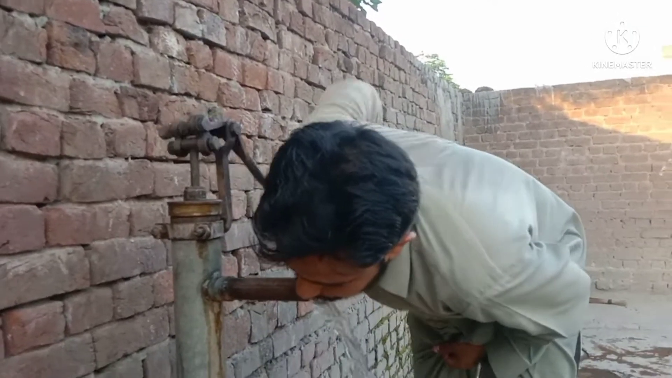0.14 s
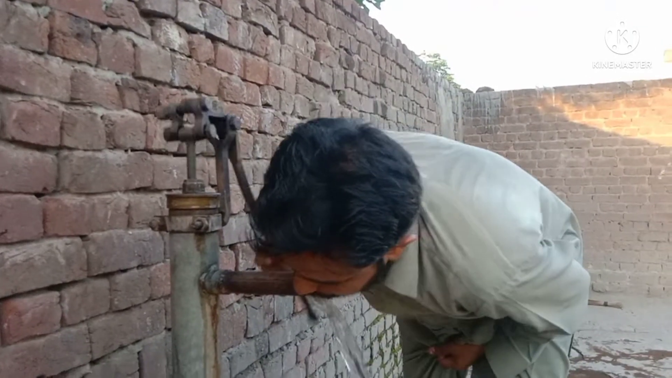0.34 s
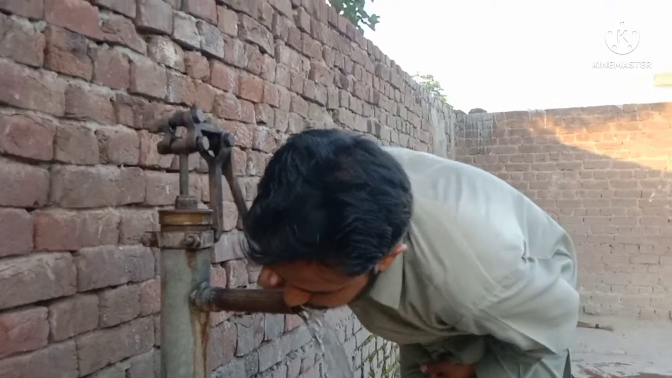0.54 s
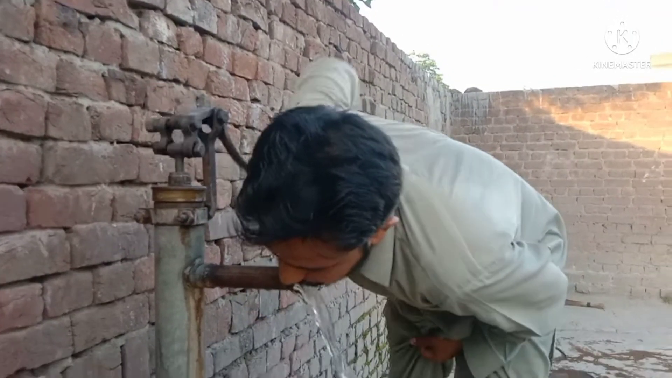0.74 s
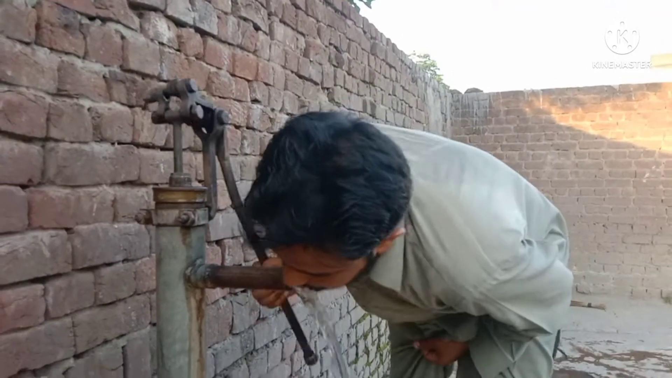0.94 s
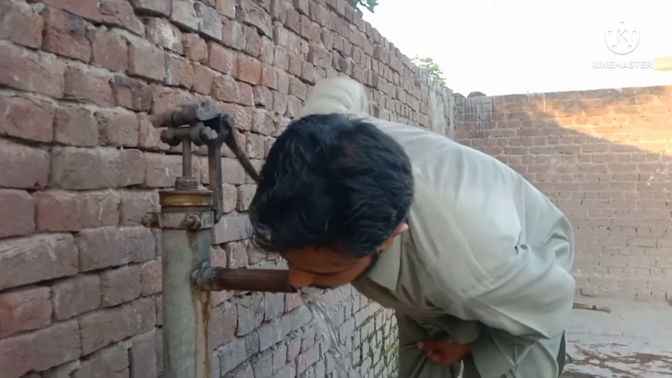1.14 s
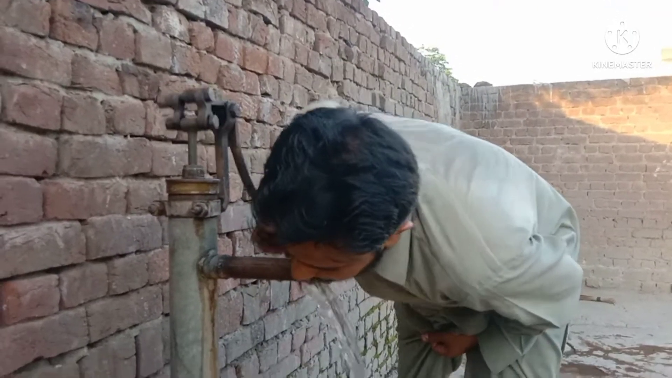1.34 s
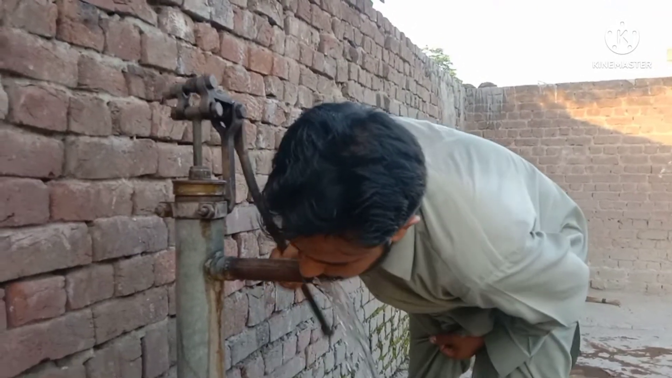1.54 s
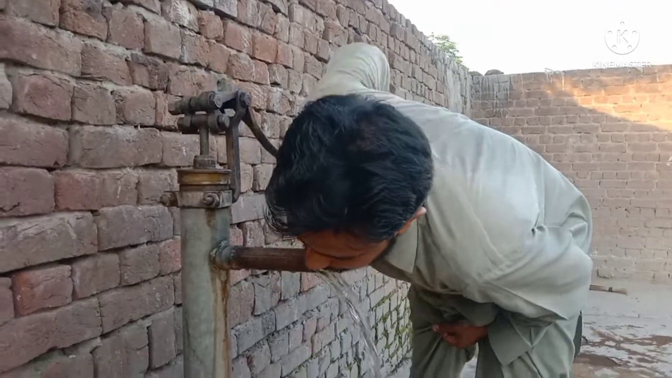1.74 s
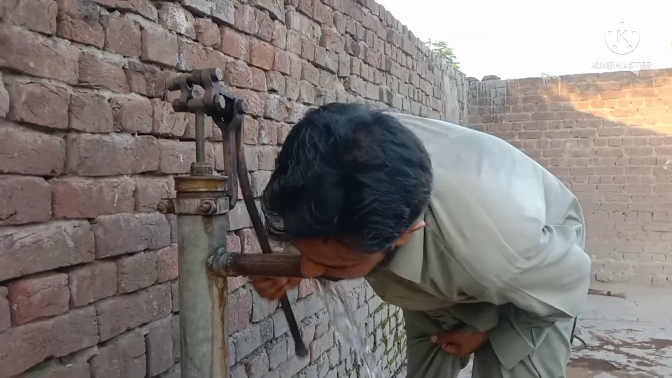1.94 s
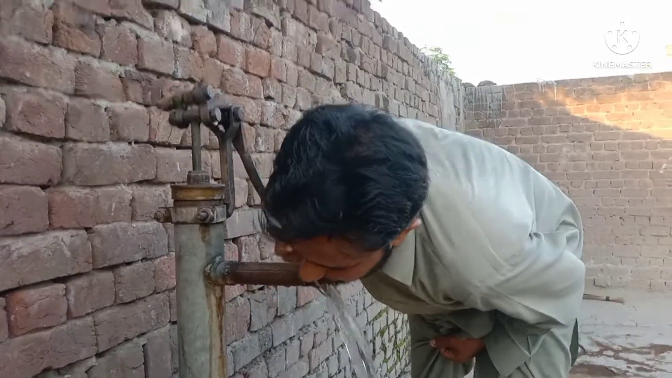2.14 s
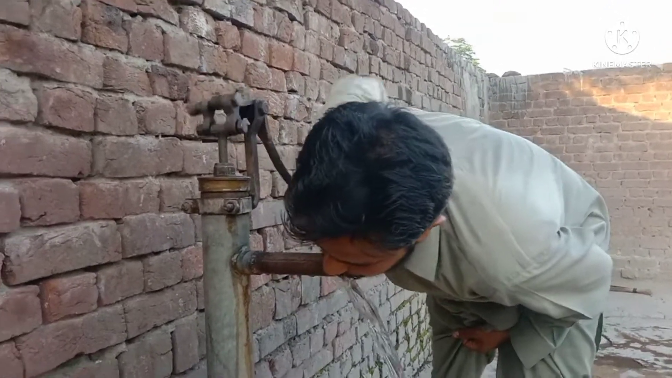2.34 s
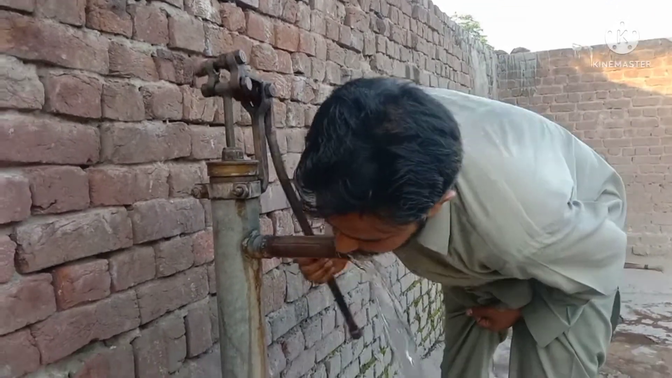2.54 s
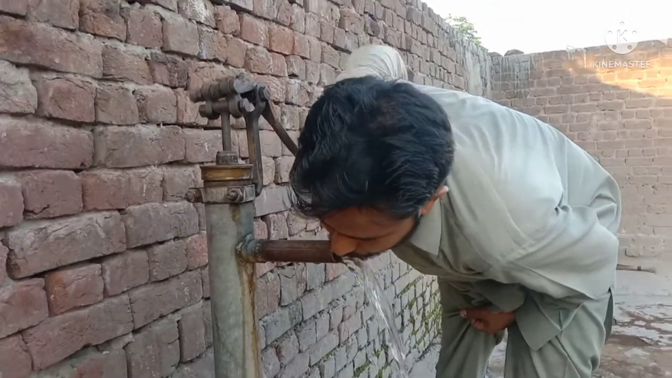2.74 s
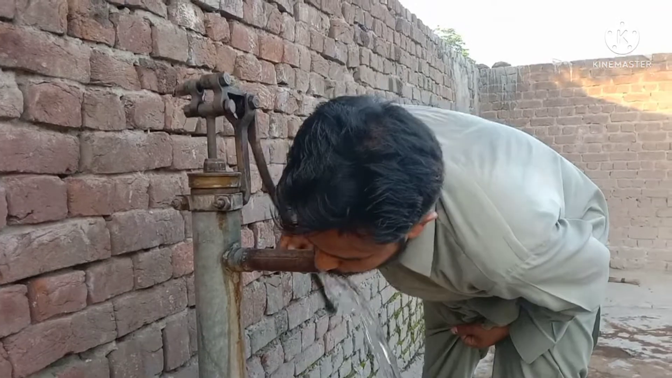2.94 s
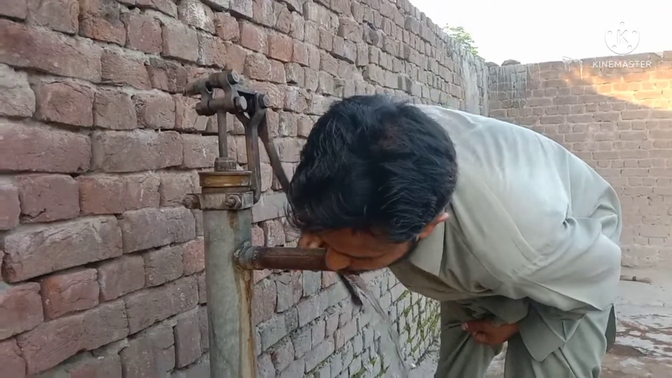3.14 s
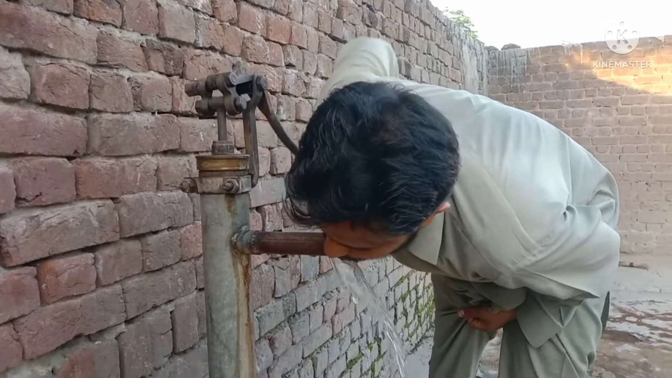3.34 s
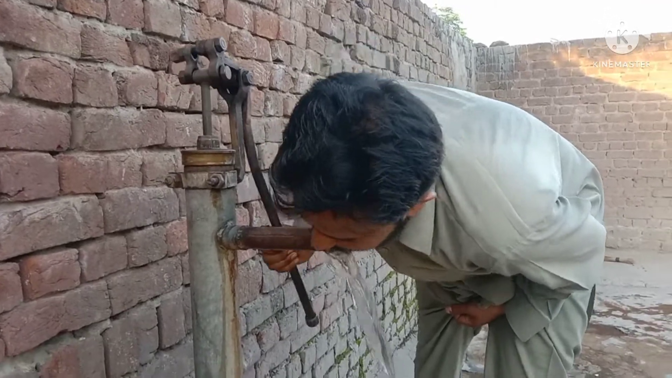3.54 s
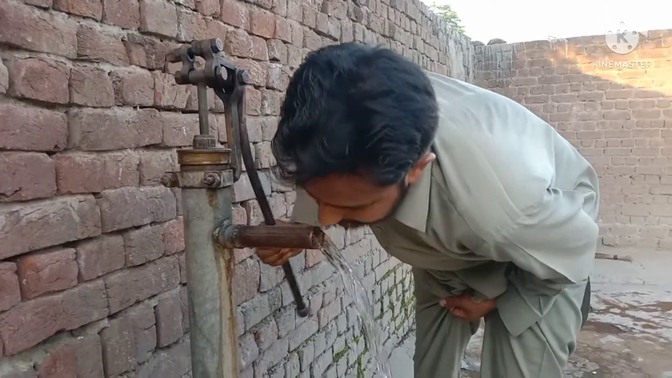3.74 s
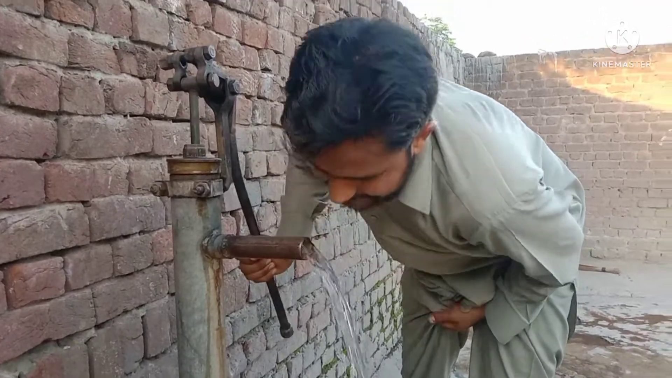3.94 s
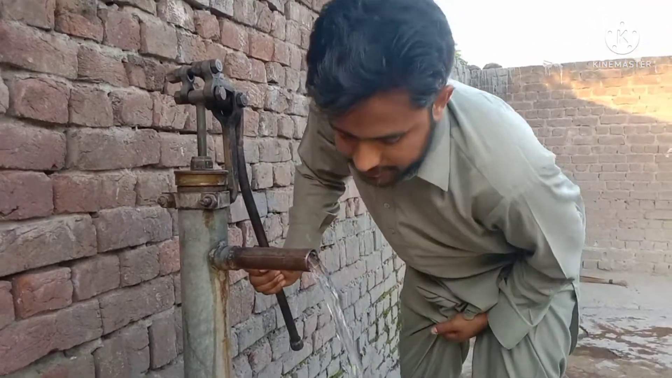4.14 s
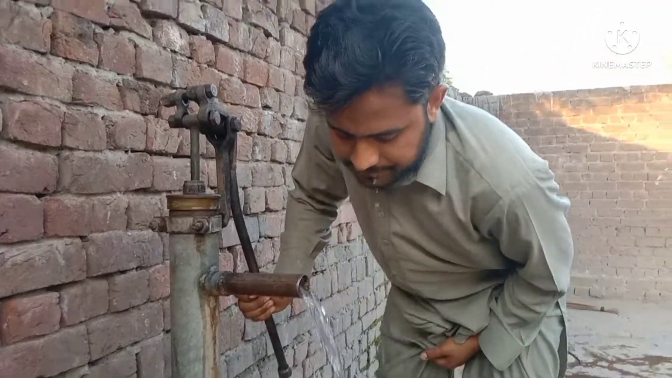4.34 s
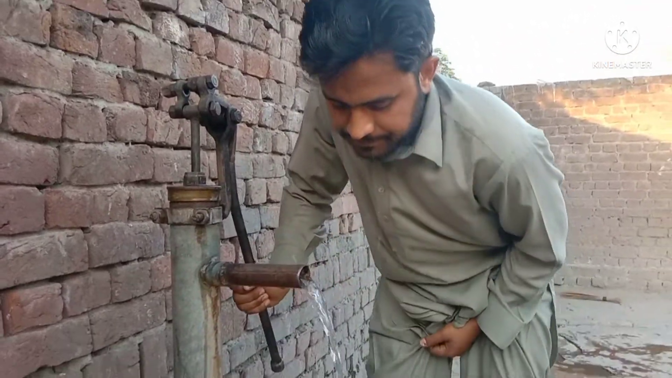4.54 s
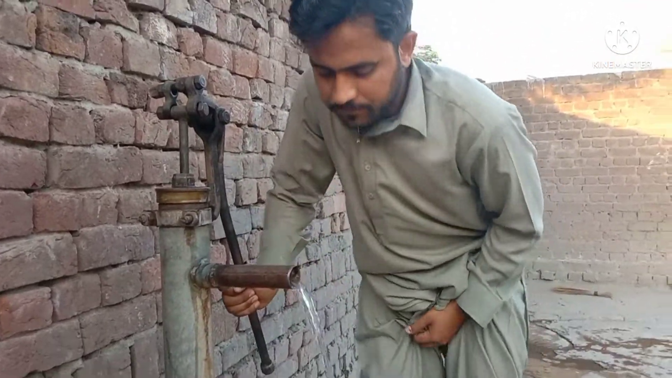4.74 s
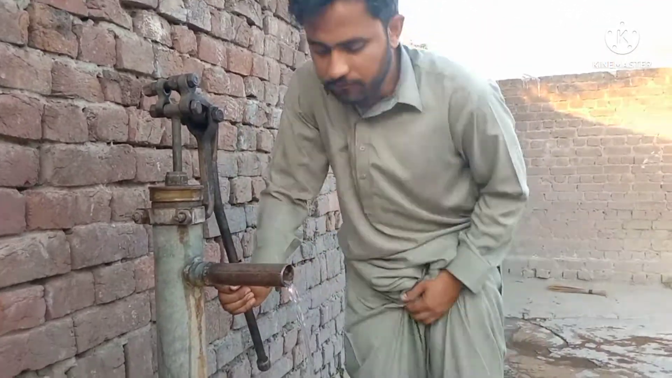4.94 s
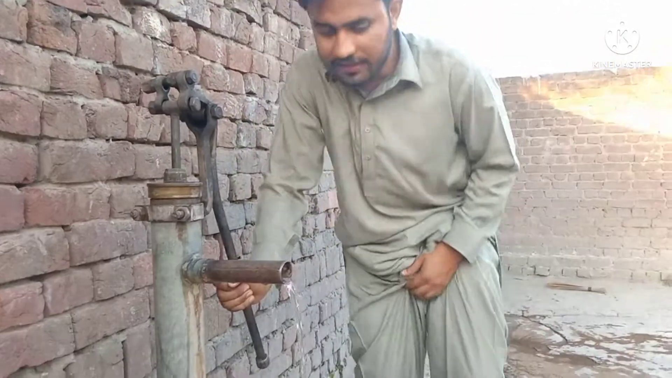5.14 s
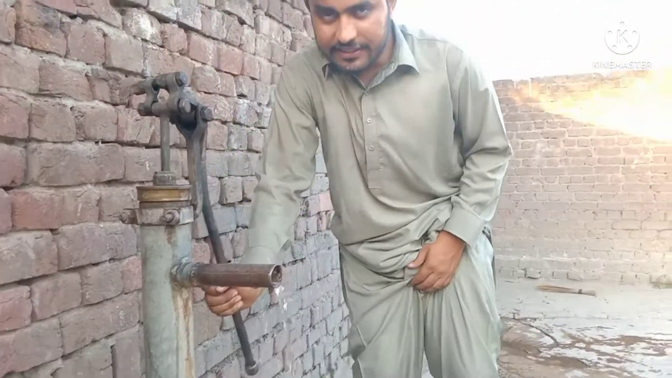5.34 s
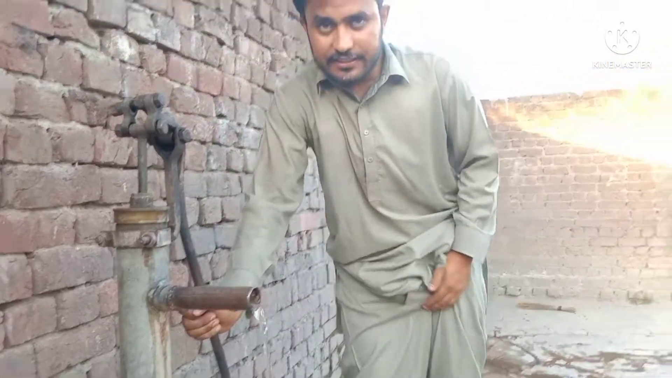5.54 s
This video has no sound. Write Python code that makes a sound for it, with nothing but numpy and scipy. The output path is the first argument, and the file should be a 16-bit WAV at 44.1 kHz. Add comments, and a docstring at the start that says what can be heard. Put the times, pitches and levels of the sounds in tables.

```python
"""An iron hand pump is worked in short strokes in a brick yard, about two a second.
Its loose linkage knocks as bursts of tiny impacts ring the iron; the rod scrapes and the barrel booms.
Water spurts out as a crowd of rising bubble notes, and ticks and slaps on the ground as filtered clicks.
Then the handle rests and the stream thins to single drops, with soft glugs and a faint whistle.
A wall adds short echoes, and filtered noise makes the quiet open air."""
import sys
import numpy as np
from scipy import signal
from scipy.fft import rfft, irfft
from scipy.io import wavfile

SR = 44100
rng = np.random.default_rng(int(sys.argv[2]) if len(sys.argv) > 2 else 0)


def digitize_waveform(pressure):
    """Quantize a signal to 16-bit integers and store it at the path in sys.argv[1].

    Rows of a 2-D input are taken as channels; values are limited to [-1, 1].
    """
    field = np.atleast_2d(pressure).T
    bounded = np.clip(field, -1, 1)
    quanta = np.round(bounded * 32767).astype(np.int16)
    wavfile.write(sys.argv[1], SR, quanta)


N = 246959
TIME = np.arange(N) / SR  # seconds, whole scene
RING = TIME[:8192]  # seconds, one short sound


# Knocks of the loose linkage, levels before each layer's own gain:
# [t/s, middle level/dB, treble level/dB, barrel level/dB]
KNOCK_TIMES = [(0.04, -12, -33, -30.5), (0.194, -13, -22.5, -30.5), (0.212, -15.5, -23, -51),
               (0.243, -10, -17, -57), (0.277, -8, -21, -27.5), (0.411, -9, -15, -23),
               (0.434, -11, -18.5, -24.5), (0.711, -21, -34, -33), (0.729, -13.5, -18.5, -42),
               (0.759, -11.5, -19, -42.5), (0.796, -10.5, -16, -25.5), (0.893, -17.5, -26, -32),
               (0.911, -11, -41, -38.5), (0.921, -12.5, -17.5, -28.5), (1.222, -15, -23, -32.5),
               (1.272, -13, -19, -34.5), (1.289, -4, -19, -25), (1.428, -13, -17, -35.5),
               (1.436, -11.5, -31, -28), (1.451, -10.5, -20, -22.5), (1.575, -16, -29.5, -40.5),
               (1.746, -17.5, -21.5, -46), (1.773, -10.5, -17.5, -48), (1.797, -15.5, -25.5, -35.5),
               (1.907, -23, -21, -45), (1.94, -9, -24, -31), (1.951, -9.5, -16.5, -27.5),
               (1.972, -15.5, -24.5, -28.5), (2.08, -13, -27.5, -34), (2.231, -16, -27.5, -40),
               (2.283, -9.5, -19, -39.5), (2.314, -9, -22.5, -29.5), (2.461, -11, -17, -28.5),
               (2.476, -5, -23, -23), (2.487, -9.5, -15.5, -29.5), (2.615, -14.5, -33.5, -42),
               (2.745, -18.5, -25, -37.5), (2.812, -13, -19, -49), (2.833, -11, -38, -33),
               (2.918, -15, -29.5, -28), (3, -14.5, -22, -29), (3.015, -8.5, -16.5, -33.5),
               (3.353, -10.5, -19.5, -30.5), (3.423, -20.5, -21, -30.5), (3.533, -12.5, -21.5, -27),
               (3.554, -7, -15.5, -31), (3.703, -20, -31, -55), (3.933, -23, -30, -45)]
# Ringing tones of the iron head and handle: [f/Hz, level/dB, time to fall 60 dB/s]
IRON_TONES = [(903, 2, 0.14), (1113, 2.5, 0.06), (1248, 8, 0.061), (1386, 9, 0.04), (2020, -26.5, .1),
              (2240, 5.5, 0.037), (2497, 9.5, 0.015), (2956, -33.5, 0.11), (3490, -28, 0.027),
              (4644, 3.5, 0.038), (4985, 1, 0.057), (5640, 1.5, 0.059), (5820, 0.5, 0.038),
              (6970, 1.5, 0.03), (11900, -29, 0.18), (11960, -17, 0.14)]
# Ringing tones of the air in the barrel and riser pipe: [f/Hz, level/dB, time to fall 60 dB/s]
BARREL_TONES = [(83.2, -7, 0.15), (117.5, -8.5, 0.28), (145, 1, 0.11), (195.3, -2.5, 0.36),
                (236.8, 2, 0.16), (274.4, 4, 0.13), (335.5, 1.5, 0.06)]
# Tone colour of iron touching iron: [f/Hz, level/dB]
CLANK_COLOUR = [(260, -52), (450, -29.5), (756, -24), (863, 0.5), (1000, -10), (1250, -3.5), (1760, -1.5),
                (2870, -3.5), (3370, -21), (5420, -2), (6190, -19.5), (7280, -6.5), (7960, -14.5),
                (10200, -22), (15500, -17.5)]


def knocks(ring_db=-4, middle_db=-12, treble_db=0, fizz_db=-3, barrel_db=-2, iron_db=-15,
           thud_s=0.01, chatter_s=0.0068):
    """A loose pin chatters for some milliseconds, rings the iron and jolts the air in the barrel."""
    out = np.zeros(N)
    contact = colour(CLANK_COLOUR)
    attack = 1 - np.exp(-RING / 0.0008)
    for s, middle, treble, barrel in KNOCK_TIMES:
        chatter = clicks(9000, 3.5, size=len(RING)) * np.exp(-RING / chatter_s) * attack
        ringing = through(chatter, modes(IRON_TONES, 0.0092))
        clank = through(chatter, contact) + undb(ring_db) * ringing
        bright = band(clank, 4464, 6700) + undb(fizz_db) * band(clank, 9400, 21950)
        add(out, s, strength(band(clank, 396, 7050), middle + middle_db))
        add(out, s, strength(bright, treble + treble_db))

        jolt = rng.standard_normal(len(RING)) * np.exp(-RING / thud_s)
        boom = unit(through(jolt, modes(BARREL_TONES, 0.021))) + 0.57 * unit(band(jolt, 207, 385))
        add(out, s, strength(band(boom, 94, 500), barrel + barrel_db))
        # the dull knock of the heavy casting
        add(out, s, strength(band(jolt, 594, 1107), middle + middle_db + iron_db))
    return out


# How a layer swells with the moves of the handle; rows are lift, push, rebound.
# Attack and release are the times to change by 20 dB: [level/dB, lag/s, attack/s, release/s]
# the scrape and the froth
SCRAPE_SWELLS = [(-27, 0, 0.036, 0.21), (-18.5, 0.0055, 0.019, 0.042), (-37.5, 0.007, 0.014, 0.036)]
# the hiss and the fine fizz, same columns: [level/dB, lag/s, attack/s, release/s]
FIZZ_SWELLS = [(-23.5, -0.0014, 0.041, 0.087), (-26, -0.0076, 0.068, 0.083), (-38.5, -0.0028, 0.01, 0.068)]
# the water churning in the barrel, same columns: [level/dB, lag/s, attack/s, release/s]
CHURN_SWELLS = [(-35, 0.017, 0.14, 0.28), (-28, 0.0084, 0.01, 0.14), (-36.5, -0.0056, 0.066, 0.1)]


def gush(scrape_db=-11, ring_db=-3, froth_db=-10, hiss_db=-8, fizz_db=-7, boom_db=-9,
         gurgle_db=-11, rumble_db=-19):
    """Each stroke scrapes the rod and forces frothing water up; big air pockets gurgle in the barrel."""
    slips = clicks(3000, 2.35, size=N)
    ringing = through(slips, modes(IRON_TONES, 0.0016))
    rub = unit(through(slips, colour(CLANK_COLOUR)) + undb(ring_db) * ringing)

    froth = bubbles(776.5, 2700, cycles=10.8, glide=0.01, spread_db=3, count=2000)
    middle = undb(scrape_db) * unit(band(rub, 480, 2530))
    middle += undb(froth_db) * band(froth, 530, 2100)

    fizz = bubbles(2689, 7500, cycles=24, glide=0.015, spread_db=4, count=4000)
    hiss = unit(band(rub, 2230, 18000) + 0.41 * band(rub, 6660, 11000))
    top = undb(hiss_db) * hiss + undb(fizz_db) * band(fizz, 1900, 20000)

    churn = clicks(330, 2, size=N)
    gurgle = bubbles(104.3, 397, cycles=5.3, glide=0.029, spread_db=-2.5, count=400)
    lower = undb(boom_db) * unit(through(churn, modes(BARREL_TONES, 0.012)))
    lower += undb(gurgle_db) * band(gurgle, 78, 590)
    lower += undb(rumble_db) * unit(band(churn, 57, 110))

    upper = middle * surges(SCRAPE_SWELLS) + top * surges(FIZZ_SWELLS)
    upper *= uneven(rate_hz=59, spread_db=6)
    return upper + lower * surges(CHURN_SWELLS) * uneven(rate_hz=32, spread_db=5.5)


# The piston lifts and water surges out: [t/s, length/s, effort level/dB]
LIFT_MOVES = [(0.247, 0.048, 1), (0.783, 0.061, -2), (1.263, 0.035, 2.5), (1.772, 0.026, -1),
              (2.281, 0.04, 1), (2.801, 0.11, -1.5), (3.346, 0.057, -0.5)]
# The handle is pushed to its stop: [t/s, length/s, effort level/dB]
PUSH_MOVES = [(0.425, 0.023, 1), (0.92, 0.01, -0.5), (1.446, 0.015, -1), (1.958, 0.014, 1.5),
              (2.494, 0.015, 0.5), (3.009, 0.028, 0), (3.539, 0.016, 3)]
# The water slops back after the stop: [t/s, length/s, effort level/dB]
REBOUND_MOVES = [(0.019, 0.045, 1.5), (0.533, 0.016, 6.5), (1.032, 0.022, -2.5), (1.621, 0.023, -2),
                 (2.077, 0.01, -1), (2.619, 0.009, 0.5), (3.136, 0.022, -3.5), (3.715, 0.032, -9),
                 (3.945, 0.054, -4.5)]


def surges(shapes):
    """Gain of a layer: every lift, push and rebound raises one swell, and their powers add."""
    power = np.zeros(N)
    for moves, shape in zip((LIFT_MOVES, PUSH_MOVES, REBOUND_MOVES), shapes):
        db, lag_s, attack_s, release_s = shape
        for s, length_s, effort_db in moves:
            gain = undb(db + effort_db) * swell(s + lag_s, attack_s, length_s, release_s)
            power += gain ** 2
    return np.sqrt(power)


# Soft breathy slurps between strokes: [t/s, length/s, level/dB]
SLURP_TIMES = [(1.638, 0.19, -38), (2.74, 0.052, -34.5), (3.315, 0.064, -38)]


def slurps(attack_s=0.029, release_s=0.071):
    """Soft breathy slurps between strokes: many short rising notes under a few swells."""
    notes = bubbles(950, 2050, cycles=19, glide=0.0034, spread_db=0, count=3000)
    gain = np.zeros(N)
    for s, length_s, db in SLURP_TIMES:
        gain += undb(db) * swell(s, attack_s, length_s, release_s)
    return notes * gain


# Air pockets collapsing at the spout; the note starts below f and climbs: [t/s, level/dB, f/Hz]
PLOP_TIMES = [(0.0408, -22, 1190), (0.1812, -17.5, 1270), (1.1464, -10.5, 1857), (1.176, -14.5, 2690),
              (2.1613, -31, 2380)]


def plops(plop_db=-3, swell_s=0.0035, glide_per_s=100, pipe_db=-4, pipe_s=0.01):
    """A pocket of air shrinks as it opens, so its short note climbs; the spout pipe smears it."""
    out = np.zeros(N)
    t = RING[:1500]
    rise = (t / swell_s) ** 2 * np.exp(2 - 2 * t / swell_s)  # loudest at swell_s
    for s, db, hz in PLOP_TIMES:
        note = rise * np.sin(2 * np.pi * 0.644 * hz * t * (1 + glide_per_s * t))
        pipe = rng.standard_normal(len(t)) * np.exp(-t / pipe_s)
        smear = through(note, pipe / np.linalg.norm(pipe))
        add(out, s, undb(db + plop_db) * (note + undb(pipe_db) * smear))
    return out


# Tone colour of water hitting the wet ground: [f/Hz, level/dB]
SPLASH_COLOUR = [(200, -42.5), (600, -45.5), (1200, -6.5), (2500, -49), (3700, -32), (4600, -0.5),
                 (5700, 5.5), (7000, 2.5), (8500, 0.5), (11000, -2), (13000, 4), (15500, 9)]


def spatter(tick_db=-7, spray_db=-8, bubble_db=-10, mist_db=-19):
    """The stream breaks into droplets: each ticks on the ground, some trap a small ringing bubble."""
    mist = undb(mist_db - tick_db) * rng.standard_normal(N)
    ticks = through(unit(clicks(180, 0.67, size=N)) + mist, colour(SPLASH_COLOUR))
    spray = bubbles(11500, 17000, cycles=2, glide=0.01, spread_db=4.5, count=1000)
    rings = bubbles(4800, 7000, cycles=6, glide=0.005, spread_db=4, count=560)
    water = undb(tick_db) * band(ticks, 4100, 15000)
    water += undb(spray_db) * band(spray, 9000, 18000)
    water += undb(bubble_db) * band(rings, 4400, 12000)
    return water * stream()


# The stream under the surges, as points joined by straight lines: [t/s, level/dB]
STREAM_LEVEL = [(0, -59), (1.0, -27), (1.55, -63), (2.2, -39.5), (2.85, -23.5), (3.25, -39), (3.7, -34),
                (4.09, -27.5), (4.23, -58), (4.5, -39), (4.72, -40), (4.87, -33.5), (5.02, -31), (5.2, -54),
                (5.31, -41), (5.38, -58), (5.6, -56)]
# How the spray swells; rows are lift, push, rebound: [level/dB, lag/s, attack/s, release/s]
SPRAY_SWELLS = [(-22.5, -0.037, 0.027, 0.19), (-24.5, -0.03, 0.12, 0.097), (-29, -0.021, 0.046, 0.17)]


def stream():
    """Gain of the water reaching the ground: the stream plus a surge for each move, in clumps."""
    times, levels = np.transpose(STREAM_LEVEL)
    steady = undb(np.interp(TIME, times, levels))
    return np.hypot(steady, surges(SPRAY_SWELLS)) * uneven(rate_hz=45, spread_db=1.5)


# Large drops slapping the wet ground, levels before each layer's own gain:
# [t/s, body level/dB, spray level/dB, low ring level/dB]
DROP_TIMES = [(0.0863, -13.5, -26.5, -48), (0.161, -10, -36, -42), (0.5062, -15, -24.5, -37),
              (0.6632, -5, -27.5, -58), (0.6766, -29, -25.5, -47), (0.8734, -5.5, -29, -30),
              (1.0044, -11.5, -29, -37.5), (1.0327, -11.5, -27.5, -48), (1.0657, -6, -23.5, -48),
              (1.1401, -6.5, -22, -33), (1.1787, -10.5, -36, -38), (1.3453, -20, -30, -43),
              (1.4002, -4.5, -25, -31), (2.1146, -11.5, -36, -49), (2.163, -16, -26.5, -27.5),
              (2.1989, -11, -31, -48), (2.4284, -4.5, -27, -37), (2.5656, -11.5, -25.5, -43),
              (2.8765, -11, -32, -46), (2.968, -10, -25.5, -26), (3.1175, -16, -26.5, -45),
              (3.1551, -31, -24.5, -37), (3.476, -5.5, -25, -25.5), (3.5124, -1, -21.5, -48),
              (3.6087, -15.5, -32, -32.5), (3.6382, -14.5, -32, -38), (3.737, -10.5, -28, -53),
              (3.7794, -12, -47, -70), (3.8232, -13, -31, -57), (3.8578, -12.5, -25, -66),
              (3.9191, -14, -34, -32), (3.9998, -13, -27.5, -56), (4.0081, -7.5, -25, -40),
              (4.0368, -16, -32, -43.5), (4.0675, -19, -31, -36.5), (4.115, -26, -30, -69),
              (4.5982, -18, -38, -33), (4.806, -16, -35, -41), (4.8252, -13, -27.5, -39),
              (4.9475, -11.5, -31, -47), (4.9651, -18, -33, -35.5), (4.9894, -9, -25, -46),
              (5.038, -16.5, -34.5, -62), (5.1324, -5.5, -29, -37), (5.1609, -11.5, -29.5, -34.5),
              (5.3, -25.5, -34, -82), (5.3842, -23, -39, -82), (5.5563, -26, -43, -63)]
# The puddle ringing under a large drop: [f/Hz, level/dB, time to fall 60 dB/s]
PUDDLE_TONES = [(2420, -3, 0.037), (2720, 4.5, 0.06), (2990, -3, 0.044), (3210, -7, 0.091)]


def drops(body_db=-17, spray_db=-4, low_db=-3, scatter_db=-24, scatter_s=0.01,
          cavity_hz=5500, cavity_s=0.00053, puddle_db=-1):
    """A large drop slaps, rings its cavity briefly and throws droplets around."""
    out = np.zeros(N)
    wet = colour(SPLASH_COLOUR)
    t = RING[:2048]
    for s, body, spray, low in DROP_TIMES:
        scatter = rng.standard_normal(len(t)) * np.exp(-t / scatter_s)
        slap = (t == 0) + undb(scatter_db) * scatter  # one click, then thrown droplets
        splash = through(slap, wet)
        hz = cavity_hz * (1 + 0.13 * rng.standard_normal())
        cavity = np.sin(2 * np.pi * hz * t) * t * np.exp(-t / cavity_s)
        puddle = unit(through(slap, modes(PUDDLE_TONES, 0.012)))
        low_ring = unit(band(splash, 2076, 3030)) + undb(puddle_db) * puddle
        slap_body = unit(band(splash, 3350, 7170)) + 0.79 * unit(cavity)
        add(out, s, strength(slap_body, body + body_db))
        add(out, s, strength(band(splash, 4140, 14400), spray + spray_db))
        add(out, s, strength(low_ring, low + low_db))
    return out


# Water draining back down the barrel; f is the starting pitch: [t/s, f/Hz, peak level/dB, rise/s]
GLUG_TIMES = [(3.869, 377, -42.5, 0.013), (3.936, 300, -45, 0.012), (3.952, 186, -37, 0.0077),
              (4.752, 140, -47.5, 0.022), (4.787, 967, -34.5, 0.0061), (5.506, 408, -58.5, 0.026)]
# Notes of a faint whistle; the pitch wavers around f: [t/s, length/s, f/Hz, level/dB]
WHISTLE_NOTES = [(4.026, 0.1, 820, -43.5), (4.168, 0.066, 910, -54), (4.284, 0.09, 906, -52),
                 (4.531, 0.32, 797, -53.5)]


def draining():
    """After the last push the barrel glugs in soft rising notes and something whistles faintly."""
    out = np.zeros(N)
    waver = unit(band(rng.standard_normal(N), 3.9, 35))
    for s, length_s, hz, db in WHISTLE_NOTES:
        t = TIME[:int(length_s * SR)]
        phase = 2 * np.pi * hz * t + 1.25 * np.interp(s + t, TIME, waver)
        add(out, s, undb(db) * np.sin(np.pi * t / length_s) * np.sin(phase))
    for s, hz, db, rise_s in GLUG_TIMES:
        rise = (RING / rise_s) ** 2 * np.exp(2 - 2 * RING / rise_s)
        add(out, s, undb(db) * rise * np.sin(2 * np.pi * hz * RING * (1 + 0.5 * RING)))
    return out


def trickle(trickle_db=-50):
    """Fine drips from the wet spout tick faintly all the way through, as sparse bright clicks."""
    drips = through(clicks(90, 2.5, size=N), colour(SPLASH_COLOUR))
    bright = 0.19 * band(drips, 5900, 21950) + band(drips, 6700, 21950)
    return unit(bright) * undb(trickle_db)


def bricks(x, near_db=-10, near_s=0.0024, far_db=-25, far_s=0.032):
    """The rough wall beside the pump scatters the sound at once; the open yard adds a faint tail."""
    near = band(rng.standard_normal(len(RING)), 210, 12700)
    near *= np.exp(-RING / near_s) * (RING > 0.002)
    far = band(rng.standard_normal(len(RING)), 80, 6600)
    far *= np.exp(-RING / far_s) * (RING > 0.012)
    echo = undb(near_db) * near / np.linalg.norm(near) + undb(far_db) * far / np.linalg.norm(far)
    return x + through(x, echo)


# Tone colour of the quiet open air: [f/Hz, level/dB]
AIR_COLOUR = [(30, -33), (130, -16.5), (400, -11.5), (700, -19.5), (1100, -15), (1600, -1), (2050, -14.5),
              (2800, -12.5), (3800, -25), (5500, -15), (8000, -10), (11000, -21.5), (15500, -8.5)]


def outdoors(air_db=-55):
    """Quiet open air: steady random noise with a fixed tone colour."""
    return unit(through(rng.standard_normal(N), colour(AIR_COLOUR))) * undb(air_db)


def bubbles(low_hz, high_hz, cycles, glide, spread_db, count):
    """Short rising notes at random times and pitches; rms 1."""
    out = np.zeros(N)
    for when, pitch, size, life in rng.random((count, 4)):
        hz = low_hz * (high_hz / low_hz) ** pitch
        decay = cycles * (0.5 + life) / hz  # seconds
        age = np.arange(int(5 * decay * SR) + 2) / SR / decay  # in decay times
        note = np.sin(2 * np.pi * hz * decay * age * (1 + glide * age))
        note *= np.exp(-age) * (1 - np.exp(-6 * age))
        add(out, when * N / SR, undb(spread_db * min(-np.log(1 - size), 3)) * note)
    return unit(out)


def clicks(rate, spread_db, size):
    """Random impacts, so many a second, many small and a few large."""
    sizes = undb(spread_db * np.minimum(rng.exponential(size=size), 3.5))
    return (rng.random(size) < rate / SR) * sizes * rng.choice([-1, 1], size)


def modes(table, detune):
    """Dying tones of unit energy; each call shifts their pitches, signs and levels a little."""
    hz, db, t60 = np.transpose(table)[:, :, None]
    shift, sign, weight = rng.standard_normal((3, len(table), 1))
    tones = np.sin(2 * np.pi * hz * (1 + detune * shift) * RING) * np.sign(sign)
    decay = np.exp(-np.log(1000) * RING / t60)
    ring = np.sum(undb(db + 2 * weight) * tones * decay, axis=0)
    return ring / np.linalg.norm(ring)


def swell(s, attack_s, hold_s, release_s):
    """Gain that rises, holds at 1 around a moment and dies away."""
    early = np.maximum(s - hold_s / 2 - TIME, 0) / attack_s
    late = np.maximum(TIME - s - hold_s / 2, 0) / release_s
    return undb(-20 * np.minimum(early + late, 10))


def uneven(rate_hz, spread_db):
    """Gain that wanders at random, as water comes in clumps."""
    knots = np.clip(rng.standard_normal(size=2048), -2, 1.5)
    return undb(spread_db * np.interp(TIME * rate_hz, np.arange(len(knots)), knots))


def colour(points):
    """Impulse response of unit energy with this tone colour, its energy packed at the start."""
    hz, db = np.transpose(points)
    grid = np.linspace(1, SR / 2, 513)
    gain = undb(np.interp(np.log(grid), np.log(hz), db))
    # folding the cepstrum (spectrum of the log spectrum) gives minimum phase
    cepstrum = irfft(np.log(gain))
    half = len(cepstrum) // 2
    cepstrum[1:half] *= 2
    cepstrum[half + 1:] = 0
    response = irfft(np.exp(rfft(cepstrum)))
    return response / np.linalg.norm(response)


def through(x, response):
    """Play a sound through an impulse response."""
    return signal.fftconvolve(x, response)[:len(x)]


def band(x, lo_hz, hi_hz):
    """Steep band-pass: keep only what lies between two frequencies."""
    sos = signal.butter(4, [lo_hz, hi_hz], "band", fs=SR, output="sos")
    return signal.sosfilt(sos, x + 1e-18)


def undb(db):
    """Decibels to gain."""
    return 10 ** (np.asarray(db) / 20)


def unit(x):
    """Scale to rms 1."""
    return x / np.sqrt(np.mean(x ** 2) + 1e-18)


def strength(x, db):
    """Scale a short sound so that its energy equals that level held for a fiftieth of a second."""
    return x * undb(db) / np.sqrt(np.sum(x ** 2) / (SR / 50) + 1e-18)


def add(out, s, x):
    """Mix a short sound in at a time in seconds."""
    i = int(s * SR)
    out[i:i + len(x)] += x[:N - i]


def scene():
    """Pump and water beside the wall, in quiet open air."""
    water = gush() + slurps() + plops() + spatter() + drops() + draining() + trickle()
    return (bricks(knocks() + water) + outdoors())[None]


def record(dry):
    """Round off the highest peaks and cut the treble above 15.8 kHz."""
    low_pass = signal.ellip(10, 0.2, 70, 15800, fs=SR, output="sos")
    return signal.sosfilt(low_pass, np.tanh(dry))


dry = scene()
out = record(dry)
digitize_waveform(out)
```